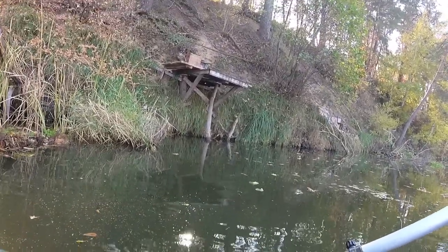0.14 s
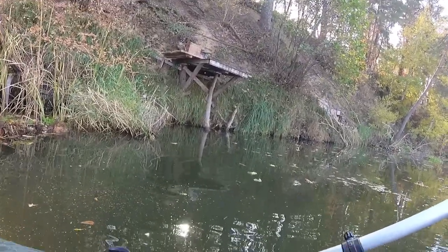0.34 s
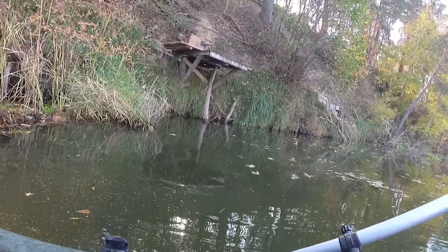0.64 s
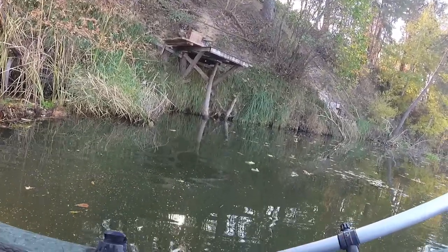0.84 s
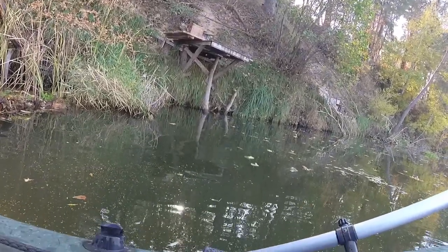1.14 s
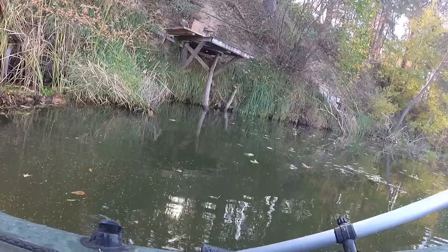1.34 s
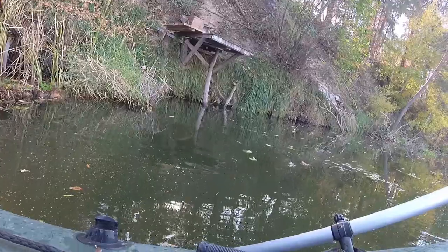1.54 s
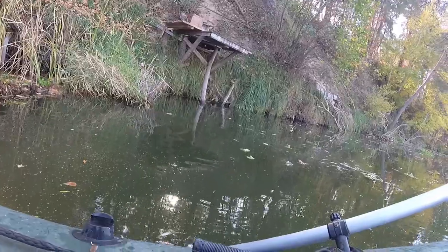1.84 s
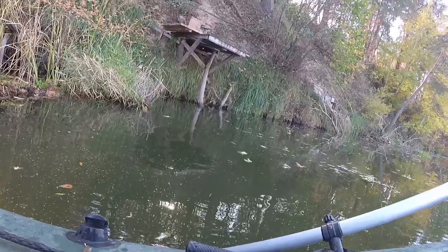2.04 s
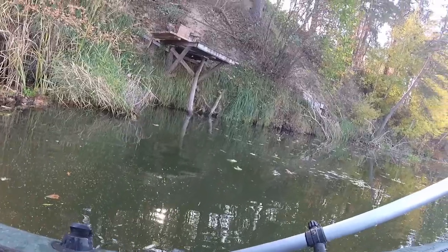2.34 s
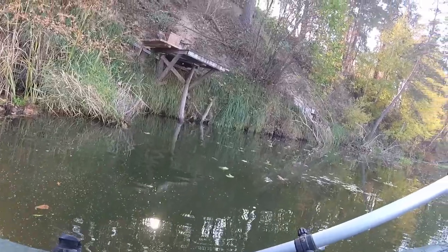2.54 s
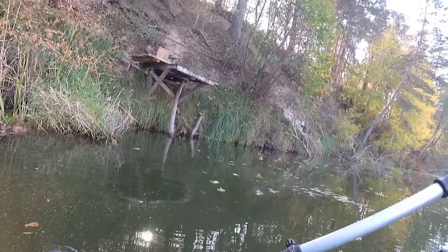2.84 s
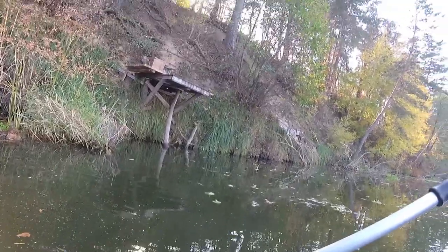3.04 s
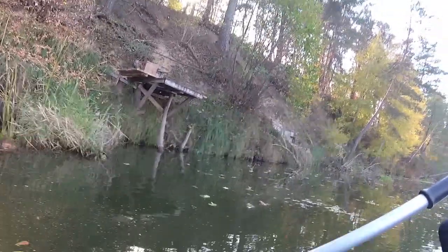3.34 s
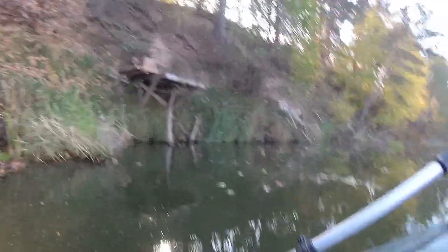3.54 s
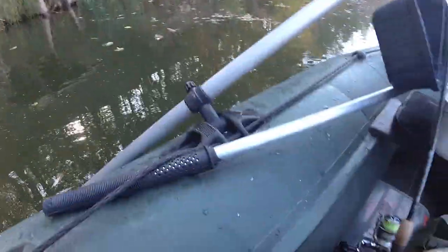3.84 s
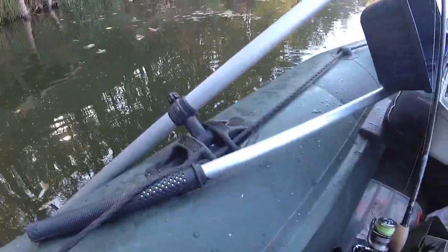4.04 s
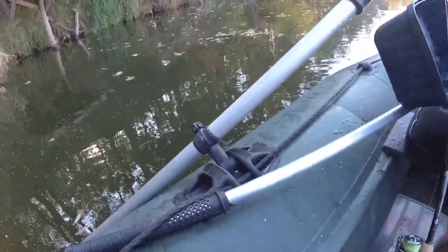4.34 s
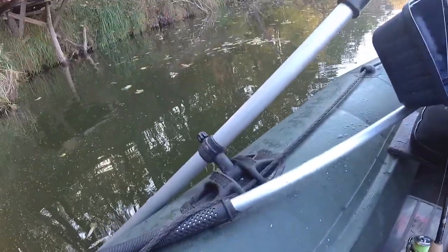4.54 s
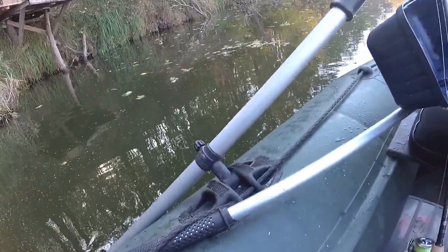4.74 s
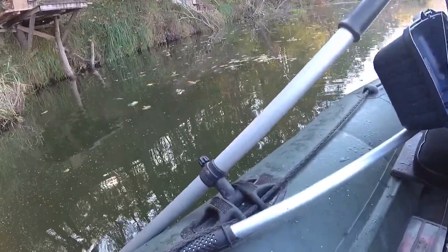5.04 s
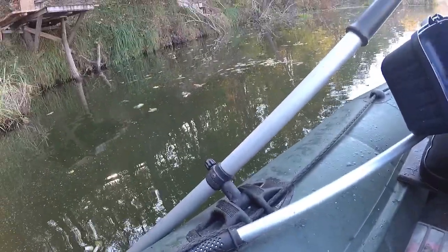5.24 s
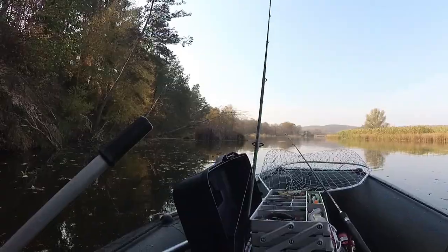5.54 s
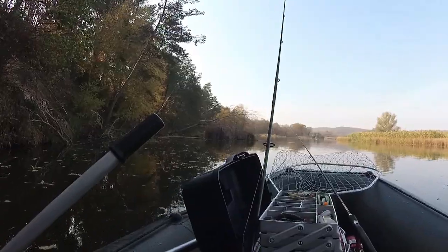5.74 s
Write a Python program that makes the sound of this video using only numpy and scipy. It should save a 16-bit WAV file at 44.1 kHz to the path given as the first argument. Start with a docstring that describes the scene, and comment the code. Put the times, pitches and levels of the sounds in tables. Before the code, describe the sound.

Irregular knocks on a hand-held case, short, dull and boomy with clicking edges, some overloading the microphones. Skin rumbles and rasps on the casing, fabric swishes, and a few blows give a tiny metallic ping. Activity is scattered at first, dense around three seconds, then calm, with light handling after a brief silent gap. Quiet open-air background, sound leaning right.

```python
"""Knocks on a hand-held camera, gripped and turned as gear is handled in an inflatable boat on still water.
They reach two microphones through the case as short boomy thuds with a noisy crack, mostly on the right,
where the hardest overload the input. Damped tones clack and metal pings; noise bursts scratch.
Random slips rub and rumble, and filtered noise makes cloth swishes, a faint outdoor hush with soft boat
bumps and a very faint high whine."""
import sys
import numpy as np
from scipy import signal
from scipy.fft import rfft, irfft, next_fast_len
from scipy.io import wavfile
from scipy.ndimage import uniform_filter1d

SR = 44100
rng = np.random.default_rng(int(sys.argv[2]) if len(sys.argv) > 2 else 0)


def persist_wave(psi):
    """Save psi, clipped to +-1, as 16-bit WAV."""
    counts = np.round(np.clip(psi, -1, 1) * 32767).astype(np.int16)
    wavfile.write(sys.argv[1], SR, np.atleast_2d(counts).T)


N = 260186
TIME = np.arange(N) / SR


def amp(db):
    """Decibels to gain."""
    return 10 ** (np.asarray(db) / 20)


def unit(x):
    """Scales each channel to rms 1."""
    return x / np.sqrt(np.mean(x ** 2, -1, keepdims=True) + 1e-20)


def peaked(x):
    """Scales each channel to peak 1."""
    return x / (abs(x).max(-1, keepdims=True) + 1e-20)


def colour(x, points):
    """Shapes x by a spectrum drawn through points on a log frequency axis, at rms 1."""
    f, db = np.transpose(points)
    length = x.shape[-1]
    size = next_fast_len(length)
    hz = np.fft.rfftfreq(size, 1 / SR)
    gain = amp(np.interp(np.log(hz + 1), np.log(f), db))
    return unit(irfft(rfft(x, size) * gain, size)[..., :length])


def wander(per_s):
    """A random drift of rms 1, heading for a new value per_s times a second."""
    steps = rng.standard_normal(N)
    return unit(np.interp(TIME * per_s, np.arange(N), steps))


def add(mix, s, sound):
    """Mixes a stereo sound in at time s."""
    part = mix[:, max(round(s * SR), 0):][:, :sound.shape[1]]
    part += sound[:, :part.shape[1]]


def stereo(left_db, right_db):
    """Gains of the left and right channels."""
    return amp([[left_db], [right_db]])


def contact(t, ms, rise):
    """Force of a touch: a quick rise, then an exponential fall with time constant ms."""
    u = t * 1000 / max(ms, .3)
    return peaked((1 - np.exp(-u / abs(rise))) * np.exp(-u))


def arch(peak_s, swell_s, fade_s, end_db=-24, curve=2.03):
    """A sliding contact speeds up to its peak and slows to rest."""
    # end_db is the level one swell before and one fade after the peak; curve 1 = pointed, 2 = round
    u = np.maximum((peak_s - TIME) / swell_s, (TIME - peak_s) / fade_s)
    return amp(end_db * np.minimum(abs(u), 4) ** curve)


def ring(x, hz, q):
    """One damped resonance."""
    return signal.lfilter(*signal.iirpeak(hz, max(q, .6), fs=SR), x)


def dull(x, hz):
    """A soft contact cannot follow fast changes: a gentle low-pass."""
    return signal.lfilter(*signal.butter(1, hz, fs=SR), x)


# resonances of the case: (frequency [Hz], Q, level over the direct sound [dB])
CASE_RESONANCES = [(365, 1.1, 12.5), (515, 8.7, 2.5), (659, 25, -5), (1420, 3.3, -13), (1795, 23, -9),
                   (2900, 11, -8), (4210, 5.9, -5)]


def case(x):
    """Contact noise picks up the resonances of the case on its way to the microphones."""
    return x + sum(amp(db) * ring(x, hz, q) for hz, q, db in CASE_RESONANCES)


def whine(hz=11200, q=45, level_db=-71, throb_per_s=60, depth=0.42):
    """A very faint, throbbing high whine: noise through two narrow resonances."""
    band = unit(ring(ring(rng.standard_normal((2, N)), hz, q), hz, q))
    throb = 1 + depth * np.sin(2 * np.pi * throb_per_s * TIME)
    return amp(level_db) * band * throb


# spectrum of the low air noise: (frequency [Hz], relative level [dB])
AIR_SPECTRUM = [(20, 1), (50, 3.5), (110, 9.5), (220, -3), (350, -6.5), (550, -59), (1000, -82),
                (3000, -39.5), (14000, -35)]
# base level of the hush, before swells and lulls: left, right (level [dB])
HUSH_LEVELS = [
    [-72.5],
    [-39],
]
# notes at which the boat's small bumps ring: (pitch [Hz], relative level [dB])
BUMP_RESONANCES = [(135, -1.5), (175, -1), (225, 1), (290, -2.5), (350, -8.5)]
# lulls in the hush: (start [s], end [s], depth [dB])
HUSH_LULLS = [(1.72, 2.3, -21), (2.65, 2.89, -35), (5.528, 5.847, -23)]


def hush(swell_db=2.5, bumps_per_s=7, bump_db=-2, bump_q=4.8, soft_hz=240, lull_edge_s=0.17):
    """Low air noise over the water, with small soft bumps of differing pitch as the boat stirs."""
    air = colour(rng.standard_normal((2, N)), AIR_SPECTRUM) * amp(swell_db * wander(per_s=25))
    # bumps_per_s is the mean rate at each note
    shape = (len(BUMP_RESONANCES), N)
    nudges = (rng.random(shape) < bumps_per_s / SR) * rng.standard_normal(shape)
    notes = sum(amp(db) * ring(nudge, hz, bump_q) for nudge, (hz, db) in zip(nudges, BUMP_RESONANCES))
    bumps = unit(dull(dull(notes, soft_hz), soft_hz))
    lull_db = 0
    for start, end, db in HUSH_LULLS:
        to_edge_s = np.minimum(TIME - start, end - TIME)
        lull_db = lull_db + db * np.clip(to_edge_s / lull_edge_s + .5, 0, 1)
    return amp(HUSH_LEVELS) * amp(lull_db) * (air + amp(bump_db) * bumps)


# spectrum of sliding fabric: (frequency [Hz], relative level [dB])
CLOTH_SPECTRUM = [(200, 14.5), (800, 13), (2000, 7), (3500, 6), (5500, 4), (8000, 2), (11500, 3),
                  (14000, 0), (15500, 5.5)]
# steady fine hiss, before the cloth trim: left, right (level [dB])
HISS_LEVELS = [
    [-55.5],
    [-58.5],
]
# swishes, levels before flutter and trim:
# (peak time [s], swell [s], fade [s], right level [dB], left level [dB])
CLOTH_SWISHES = [ (0.35, 1, 0.67, -68, -59), (2.08, 0.74, 0.63, -51.5, -73), (2.62, 0.17, 0.55, -63, -52.5),
                 (2.823, 0.063, 0.035, -33, -41), (2.91, 0.075, 0.065, -41.5, -58),
                 (3.425, 0.089, 0.058, -41, -41), (3.645, 0.032, 0.052, -36, -68),
                 (3.803, 0.024, 0.047, -31.5, -44), (3.87, 0.3, 0.19, -50, -46),
                 (4.72, 0.99, 0.47, -69, -58), (5.544, 0.043, 0.087, -41, -47.5),
                 (5.82, 0.33, .25, -48.5, -57)]


def cloth(trim_db=1.55, flutter_db=2.5):
    """A steady fine hiss that swells and turns grainy when fabric slides."""
    sliding = 0
    for peak_s, swell_s, fade_s, right_db, left_db in CLOTH_SWISHES:
        sliding = sliding + stereo(left_db, right_db) * arch(peak_s, swell_s, fade_s)
    grainy = sliding * amp(flutter_db * wander(per_s=2000))
    hiss = colour(rng.standard_normal((2, N)), CLOTH_SPECTRUM)
    return amp(trim_db) * (amp(HISS_LEVELS) + grainy) * hiss


# spectra of the case rumbling and of the skin's rasp: (frequency [Hz], relative level [dB])
RUMBLE_SPECTRUM = [(20, -14.5), (50, -13), (100, -5.5), (205, 5), (290, -4), (400, -10), (600, -23.5),
                   (1000, -47), (2500, -100)]
RASP_SPECTRUM = [(200, -8.5), (400, 0.5), (750, -2), (1100, 2.5), (1600, -4.5), (2400, -7.5), (3300, -11.5),
                 (5000, -19.5), (9000, -28), (15000, -54.5)]
# rumble of the resting hand, before trim: left, right (level [dB])
GRIP_LEVELS = [
    [-57],
    [-45.5],
]
# strokes of the fingers on the case, levels before trims and unevenness; flat skin muffles the rasp,
# a nail or cloth brightens it: (peak time [s], swell [s], fade [s], right rumble level [dB],
# left rumble level [dB], right rasp level [dB], treble re rasp [dB])
FINGER_STROKES = [ (0.13, 0.43, 0.17, -26.5, -22, -58, 1), (0.41, 0.22, 0.11, -34, -40, -65, 3),
                  (0.55, 0.09, 0.039, -23, -29.5, -53, 5), (0.68, 0.13, 0.24, -52, -44, -72, -2),
                  (0.94, 0.28, 0.19, -31.5, -51, -58, -8), (1.11, 0.065, 0.1, -27, -26, -51.5, 5),
                  (1.29, 0.17, .12, -73, -45, -72, -2), (1.431, 0.033, 0.042, -27, -50, -51, 9),
                  (1.665, 0.068, 0.069, -21.5, -73, -38.5, 4), (1.77, 0.04, 0.027, -30, -61, -31, 7),
                  (2.101, 0.14, 0.13, -35, -50, -55.5, -10), (2.338, 0.074, 0.12, -23, -47, -37.5, -7.5),
                  (2.62, 0.02, 0.22, -30.5, -53, -39, 2), (2.821, .04, 0.067, -28, -32.5, -29.5, -7),
                  (2.962, 0.091, 0.056, -28, -49, -23.5, -2.5), (3.032, 0.056, 0.14, -17, -41, -35.5, -3),
                  (3.155, 0.023, 0.02, -23, -36, -43, 4), (3.27, 0.043, 0.043, -30, -43, -45.5, -0.5),
                  (3.442, 0.097, 0.046, 1.5, -20.5, -21, -4), (3.631, 0.068, .04, -13.5, -44, -29, 1.5),
                  (3.798, 0.083, 0.11, -14, -50, -35, 6), (3.989, 0.095, 0.055, -27, -64, -42.5, 3),
                  (4.21, 0.076, 0.082, -32, -44, -45, -5), (4.345, 0.16, 0.12, -17.5, -48.5, -27.5, -5.5),
                  (5.55, 0.024, 0.046, -29.5, -36, -45, 14), (5.626, 0.042, 0.091, -26.5, -31, -48, 18),
                  (5.875, 0.17, 0.16, -33, -32.5, -45.5, 17)]


def rubbing(rumble_trim_db=-0.03, rasp_trim_db=3.67, left_rasp_trim_db=-2.0, slips_per_s=1100, slip_db=4.5,
            smooth=0.7, treble_hz=2500, uneven_db=1.67, uneven_per_s=70, left_cut_hz=130, rasp_lean=0.66):
    """Skin sticks and slips on the case: slips rasp, and the case rumbles under them, less deeply on the left."""
    rumble_level = amp(GRIP_LEVELS) * np.ones(N)
    body_level, treble_level = 0, 0
    for peak_s, swell_s, fade_s, right_db, left_db, rasp_db, treble_db in FINGER_STROKES:
        speed = arch(peak_s, swell_s, fade_s)
        rumble_level = rumble_level + stereo(left_db, right_db) * speed
        # the rasp leans to the touched side by a share of the rumble's lean
        left_rasp_db = rasp_db + rasp_lean * (left_db - right_db)
        rasping = stereo(left_rasp_db, rasp_db) * speed
        body_level = body_level + rasping
        treble_level = treble_level + amp(treble_db) * rasping

    # random slips of uneven strength, over smoother friction noise
    strength = amp(slip_db * np.minimum(rng.exponential(1, N), 4))
    slips = (rng.random(N) < slips_per_s / SR) * strength * rng.choice([-1, 1], N)
    friction = unit(slips) + smooth * rng.standard_normal((2, N))

    left, right = colour(friction, RUMBLE_SPECTRUM) * rumble_level * amp(rumble_trim_db)
    left = signal.lfilter(*signal.butter(2, left_cut_hz, "high", fs=SR), left)
    rumble = np.array([left, right])

    rasp = unit(case(colour(friction, RASP_SPECTRUM)))
    body = signal.sosfiltfilt(signal.butter(2, treble_hz, fs=SR, output="sos"), rasp)
    rasp = body_level * body + treble_level * (rasp - body)
    rubbed = rumble + rasp * stereo(left_rasp_trim_db, rasp_trim_db)
    return rubbed * amp(uneven_db * wander(uneven_per_s))


# spectrum of hard scraping: (frequency [Hz], relative level [dB])
SCRATCH_SPECTRUM = [(300, -20.5), (1200, 7.5), (3000, 2.5), (4500, 2.5), (7000, -1), (10000, -1.5),
                    (15000, -4.5)]
# light scratches and ticks: (time [s], decay [ms], right peak level [dB], left peak level [dB])
LIGHT_SCRATCHES = [ (0.073, 8.9, -32, -15), (0.172, 25, -50, -32), (0.259, 3.5, -52, -25),
                   (0.38, 2.8, -43, -24.5), (0.448, 7.5, -45, -35.5), (0.512, 9.7, -49, -22),
                   (0.536, 7.3, -39, -20), (0.5887, 2, -27, -25), (0.741, 2.2, -44, -31),
                   (1.044, 5.2, -47, -24), (1.05, 3.9, -53, -18.5), (1.071, 4.4, -50, -33),
                   (1.152, 11, -52, -29.5), (1.859, 1.9, -21, -46), (2.445, 1.5, -13, -12),
                   (2.683, 2.8, -5.5, -15), (2.741, 0.44, -10, -20), (3.0057, 0.81, -27, -34),
                   (3.066, 0.77, -24, -24), (3.146, 7.7, -33, -30), (3.21, 4.1, -8.5, -35),
                   (3.366, 3, -9, -12), (4.423, 0.81, -18, -1.5), (5.874, 1.2, -20, -28)]


def scratches():
    """Short bright scrapes of hard small things: noise shaped by a brief contact."""
    out, t = np.zeros((2, N)), np.arange(4000) / SR
    for s, ms, right_db, left_db in LIGHT_SCRATCHES:
        grain = colour(rng.standard_normal((2, len(t))), SCRATCH_SPECTRUM)
        scrape = peaked(grain * contact(t, ms, rise=0.18))
        add(out, s, stereo(left_db, right_db) * scrape)
    return out


# modes of a small metal part: (frequency [Hz], relative level [dB], time to fall 60 dB [s])
METAL_MODES = [(1583, -16, .12), (2162, 0, .1), (2205, -5, .08), (2261, -7, .12), (5642, -26, .06)]
# sharp blows that set it ringing: (time [s], right gain of the summed modes [dB])
METAL_PINGS = [(2.4455, -30.5), (2.6835, -58), (3.2122, -28), (4.4185, -26)]


def pings(left_db=-9):
    """A small metal part rings on briefly after sharp blows, more softly on the left."""
    out, t = np.zeros((2, N)), np.arange(9000) / SR
    tone = sum(amp(db - 60 * t / t60) * np.sin(2 * np.pi * hz * t) for hz, db, t60 in METAL_MODES)
    for s, db in METAL_PINGS:
        add(out, s, stereo(db + left_db, db) * tone)
    return out


# hard parts that meet with one short note, levels before its onset and decay:
# (time [s], pitch [Hz], time to fall 60 dB [ms], right level [dB], left level [dB])
HARD_CLACKS = [ (0.084, 405, 32, -24, -5), (0.164, 1210, 14, -17.5, -29), (0.2195, 663, 19, 7.5, 11.5),
               (0.22, 1720, 20, 8.5, -16), (0.382, 1440, 18, 0.5, -42), (0.513, 464, 75, -17, -10),
               (0.588, 780, 23, 8, 0), (1.0465, 480, 32, -14.5, -7), (1.44, 1140, 5.9, -17, -45),
               (1.697, 528, 34, 12.5, -36), (1.7, 1380, 17, 7.5, -55), (1.794, 840, 13, -7, -38),
               (2.446, 1350, 13.8, 9, -31), (2.639, 1120, 26.5, 5.5, -45), (3.0047, 790, 7.4, 9, -16),
               (3.067, 1430, 9.5, -4.5, -30), (3.212, 1720, 25, 4, -20), (3.440, 1560, 26, -4, -30),
               (3.453, 1310, 31, -2.5, -18), (3.8555, 605, 20, 0, -34), (4.419, 2014, 19, 18, -6),
               (5.655, 920, 10, -37, -28)]


def clacks():
    """Each clack is one heavily damped mode, reaching the two ports at different phases."""
    out, t = np.zeros((2, N)), np.arange(4000) / SR
    for s, hz, t60_ms, right_db, left_db in HARD_CLACKS:
        onset = np.minimum(t * hz * 2, 1)  # half a cycle long
        fade = amp(-60 * 1000 * t / t60_ms) * onset
        phase = 2 * np.pi * rng.random((2, 1))
        add(out, s, stereo(left_db, right_db) * fade * np.sin(2 * np.pi * hz * t + phase))
    return out


# spectrum of the crack before the case colours it: (frequency [Hz], relative level [dB])
CRACK_SPECTRUM = [(150, -20), (400, -15), (700, 16.5), (1300, 6), (2200, 0), (4000, -3), (7000, -19.5),
                  (15000, -50)]
# knocks on the case, thud levels before the input overloads: (time [s], right thud peak level [dB],
# left thud peak level [dB], contact time constant [ms], thud pitch [Hz], right crack re thud [dB])
CASE_KNOCKS = [ (0.076, -3.5, -11, 3.8, 234, -17), (0.141, -25, -23, 2.2, 286, -10),
               (0.165, -9, -9.5, 9.5, 267, -12.5), (0.219, 14.5, 6, 4.2, 182.2, -7.5),
               (0.248, -2, -9, 7, 196, -48), (0.381, 9, -14, 1.67, 224.6, -3.5),
               (0.513, -10, -11, 6.2, 334, -9.5), (0.5877, 12.5, -14, 2.2, 218, -6.5),
               (0.606, -28, -16, 3.6, 306, -7), (0.851, -14, -50, 5.1, 222, -56),
               (1.045, -11.5, -9.5, 9.1, 264, -32), (1.392, -6, -28, 3.6, 225, -49),
               (1.437, -23.5, -39, 2.5, 233, -22), (1.601, -12, -34, 4.8, 204, -47),
               (1.697, 14, -38, 2, 390, -9), (1.707, 2.5, -49, 1.03, 200, -26.5),
               (1.7949, 4, -24, 1.65, 201, -8), (1.858, -12.5, -36, 1.2, 256, -5.5),
               (2.355, -15, -38.5, 3.4, 239, -24), (2.4457, 5, -18, 1.63, 205, -0.5),
               (2.458, -3, -20, 5.3, 213, -50), (2.48, 2, -34, 3.6, 198, -44), (2.5, 5, -16, 4.7, 207, -42),
               (2.562, 3.5, -21, 3.9, 203, -52), (2.596, -3.5, -28, 3.3, 175, -41),
               (2.639, 18, -29, 1.33, 258, -20), (2.66, 10.5, -15, 2.3, 284, -5),
               (2.6839, 4, -4.5, 3.5, 222, -5), (2.829, -8.5, -14, 3.5, 336, 0.5),
               (2.8364, 2, 0, 6, 215, -22), (2.974, -6, -26, 6.5, 192, -10),
               (3.005, -1.5, -17, 3.5, 333, -11), (3.040, 0.5, -13, 5.5, 180, -57),
               (3.065, -16, -38.5, 2, 183, 14), (3.107, -1.5, -22.5, 10.7, 168, -44.5),
               (3.135, -4, -31, 14, 204, -33), (3.158, -7, -29, 13.6, 195, -15.5),
               (3.2132, 12.5, 6.5, 2.06, 230, -2), (3.232, 2.5, -15, 2.3, 192, -35),
               (3.242, 0, -21, 2.8, 192, -39), (3.336, -0.5, -34, 5.1, 210, -43),
               (3.368, 12.5, -9.5, 3.6, 240, -4.5), (3.382, 2.5, -7, 12.5, 236, -9),
               (3.394, 19.5, 5.5, 1.67, 225.6, -9), (3.405, 13, -2, 12.2, 243.3, -33),
               (3.418, 11.5, -13, 6.7, 224.5, -2.5), (3.446, -2.5, -18, 5.2, 230, -3),
               (3.480, -5, -19, 11.6, 223, -21), (3.6214, 13.5, -37, 7.5, 314.5, -20),
               (3.632, 12.5, -19, 4.5, 200, -11), (3.705, -10.5, -48, 1.4, 214, -38),
               (3.854, 4, -48, 1.63, 193, -22), (3.961, -6, -47, 2, 215, -12),
               (3.9684, 6, -49, 2.9, 232, -40), (4.317, -3.5, -42, 5.5, 195, -17),
               (4.4186, 19, -1, 1.9, 197, 0), (4.672, -17, -42, 1.7, 213, -21),
               (5.533, -12.5, -24, 9, 242.4, -12.5), (5.654, -2.5, -14, 2.1, 197, -7),
               (5.746, -11.5, -17, 3, 290, -42), (5.829, -4.5, -21, 4.1, 198, -26)]


def knocks(q=1.35, chatter=0.51, shake_q=2.34, soft_hz=450, after_db=-27, after_ms=20, left_crack_db=2,
           port_phase=1.78):
    """Each blow pushes the case, chatters while in contact and leaves a boom of a few cycles."""
    out, t = np.zeros((2, N)), np.arange(6000) / SR
    for s, right_db, left_db, ms, hz, crack_db in CASE_KNOCKS:
        grit, grain = rng.standard_normal((2, 2, len(t)))
        force = contact(t, ms, rise=0.25)
        rattle = amp(after_db) * contact(t, after_ms, rise=0.0726)
        # the shell swings at its own pitch while the contact lasts, out of step at the two ports
        offset = np.array([[port_phase * rng.uniform(-1, 1)], [0]])  # radians
        swing = peaked(ring(force * np.cos(2 * np.pi * hz * t + offset), hz, q))
        shake = peaked(dull(ring((force + rattle) * grit, hz, shake_q), soft_hz))
        thud = peaked(swing + chatter * shake)
        crack_force = contact(t, ms * 0.99, rise=0.11) + 0.11 * rattle
        crack = peaked(case(colour(grain, CRACK_SPECTRUM) * crack_force))
        knock = thud + stereo(crack_db + left_crack_db, crack_db) * crack
        add(out, s, stereo(left_db, right_db) * knock)
    return out


def scene():
    """All that reaches the two microphones, from the background to the knocks."""
    background = whine() + hush()
    handling = cloth() + rubbing() + scratches()
    blows = pings() + clacks() + knocks()
    return background + handling + blows


# a brief cut to silence near the end: (start [s], end [s])
SILENT_CUT = (5.486, 5.532)


def record(dry, edge_hz=15300):
    """The input overloads on hard knocks; a brief cut to silence near the end; then the band limit."""
    clipped = .99 * dry / (1 + abs(dry) ** 16) ** (1 / 16)
    silent = (TIME > SILENT_CUT[0]) & (TIME < SILENT_CUT[1])
    live = uniform_filter1d(1. - silent, size=60)  # softens the edges of the cut
    edge = signal.firwin(255, edge_hz, window=("kaiser", 8), fs=SR)
    return signal.oaconvolve(clipped * live, edge[None], "same")


dry = scene()
out = record(dry)
persist_wave(out)
```